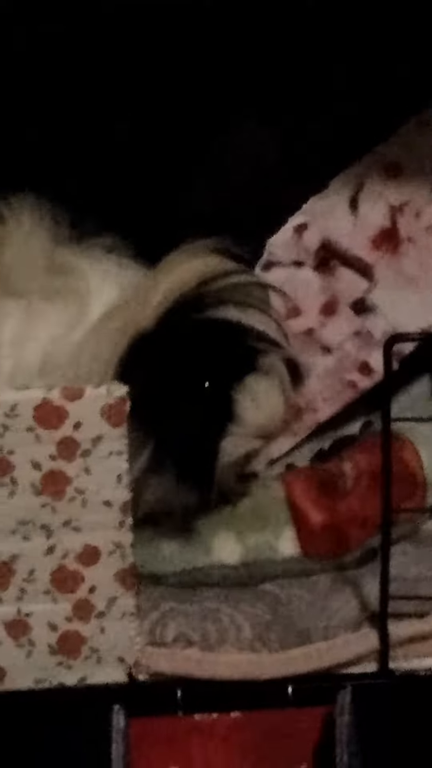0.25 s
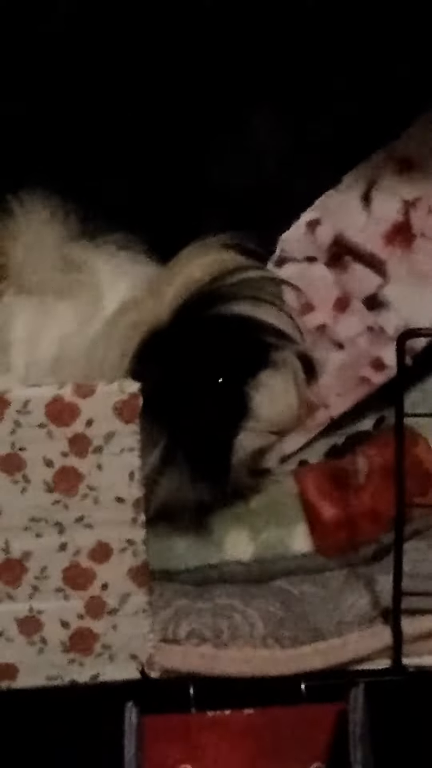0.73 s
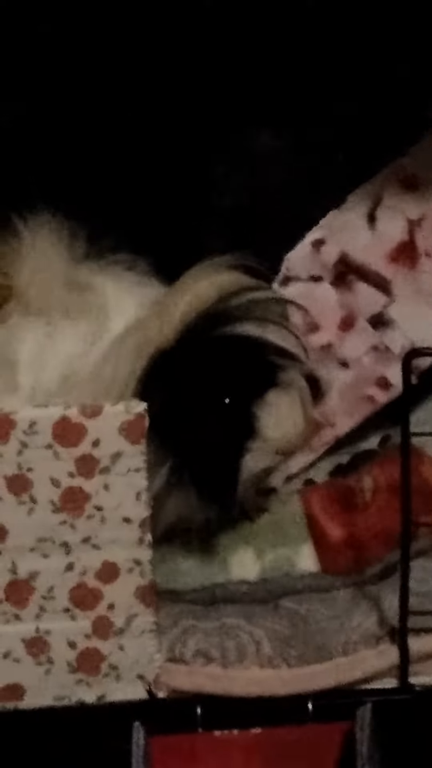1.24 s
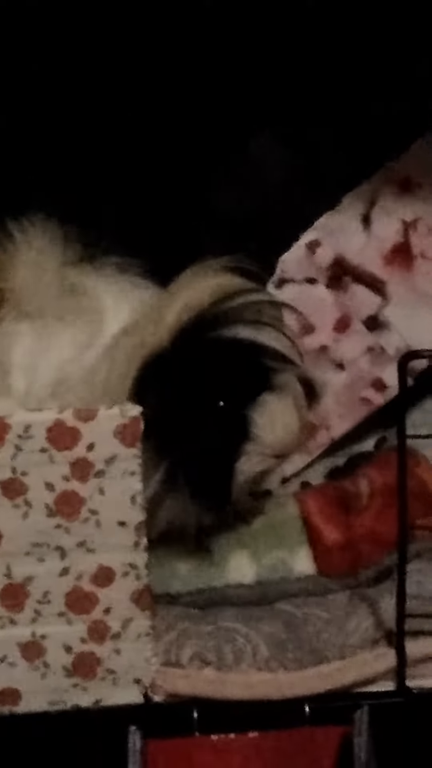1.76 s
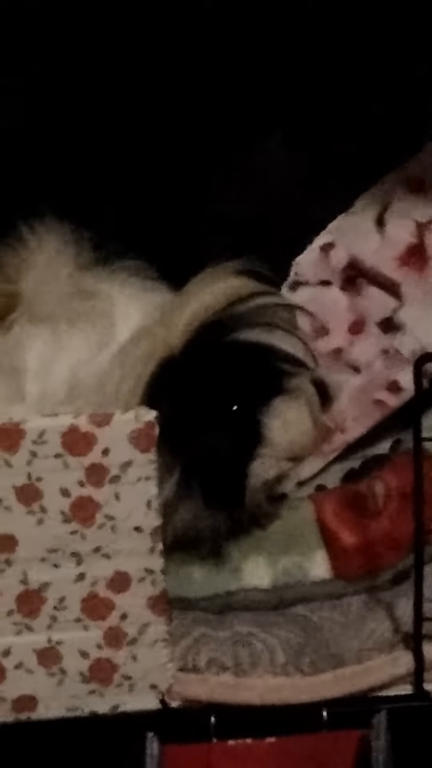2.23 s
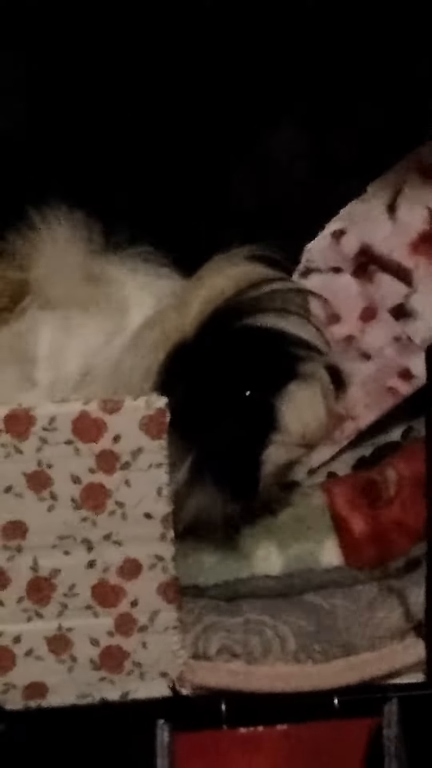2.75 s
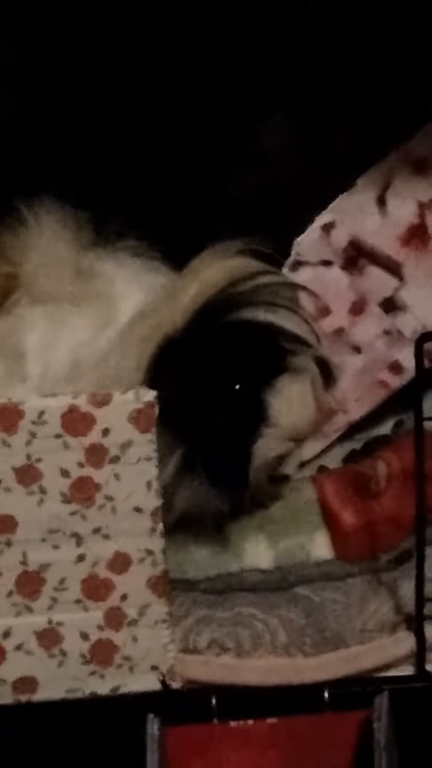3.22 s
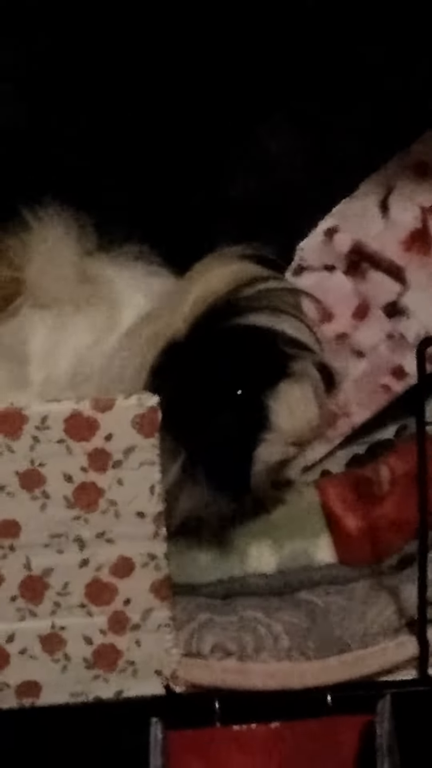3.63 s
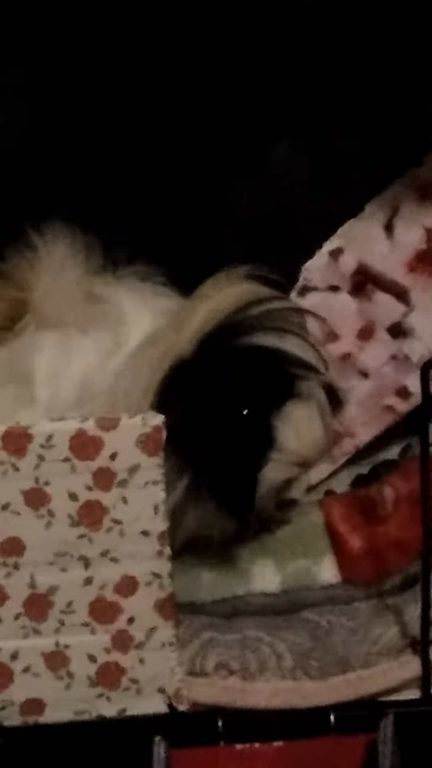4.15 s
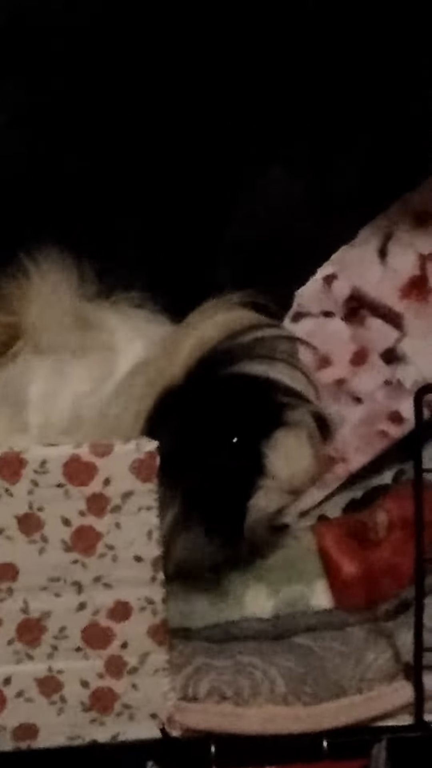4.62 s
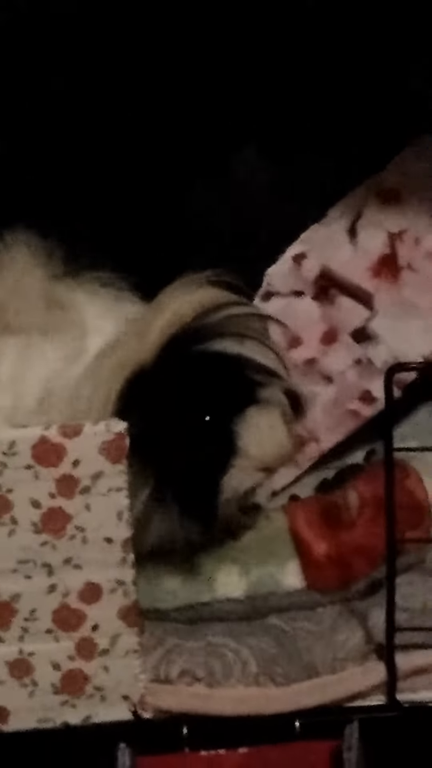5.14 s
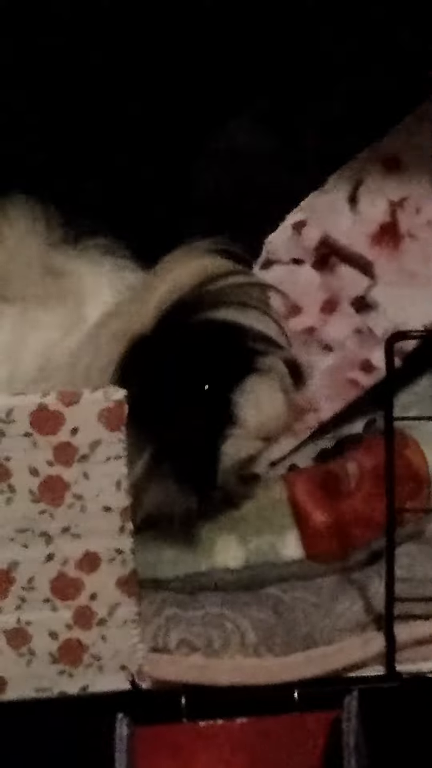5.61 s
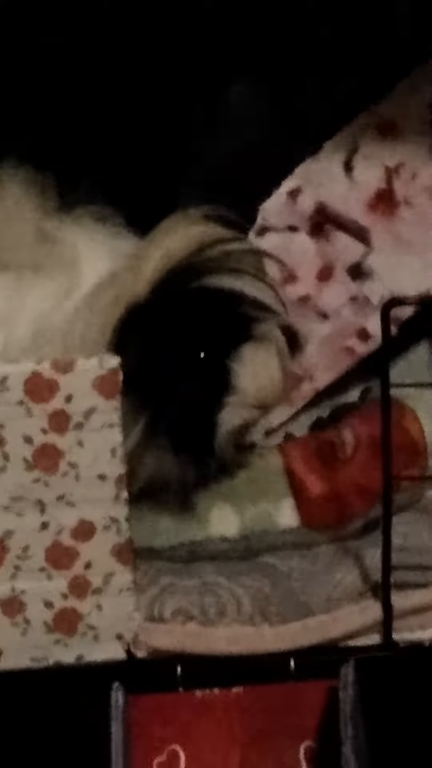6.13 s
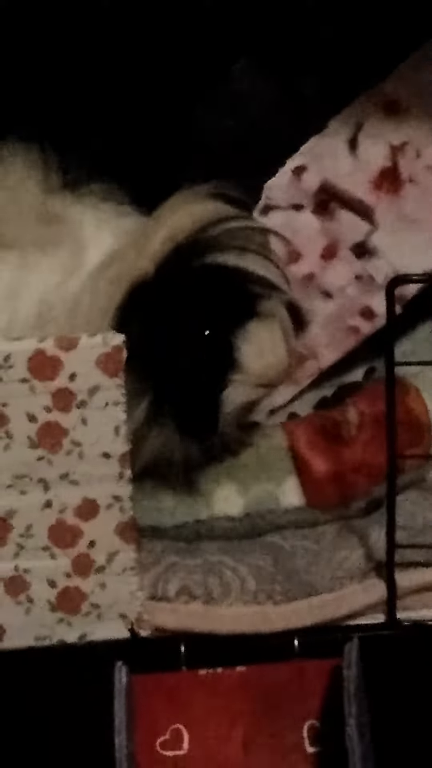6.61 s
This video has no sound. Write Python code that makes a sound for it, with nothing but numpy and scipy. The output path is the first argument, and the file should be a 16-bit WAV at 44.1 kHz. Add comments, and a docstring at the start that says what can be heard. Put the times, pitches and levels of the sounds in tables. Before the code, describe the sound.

Quick, high, falling chirps from a caged guinea pig run on over faint hiss, with one short lull.

```python
"""A quiet room, a phone microphone one step from a guinea pig in a fleece-lined cage, over a faint hiss.
From the start it chirps like a bird, six times a second: each a short falling whistle with overtones,
then a puff of air, echoed by cage and walls. Near 1.5 s three soft bumps touch the phone. After 4.2 s
the chirps turn faint and sparse, and the phone's noise gate lowers the hiss in the pauses.
From 5.6 s they are back at full strength, with one more bump near 6.2 s."""
import sys
import numpy as np
from scipy import signal
from scipy.fft import rfft, irfft, next_fast_len
from scipy.io import wavfile
from scipy.ndimage import uniform_filter1d

SR = 44100
rng = np.random.default_rng(int(sys.argv[2]) if len(sys.argv) > 2 else 0)


def inscribe(sig):
    """Save sig as 16-bit PCM at rate SR to the path in sys.argv[1].

    A 1-D sig is mono; a 2-D sig holds one channel per row.
    Samples are clipped to [-1, 1] before scaling.
    """
    pcm = np.round(np.clip(np.atleast_2d(sig).T, -1, 1) * 32767)
    wavfile.write(sys.argv[1], SR, pcm.astype(np.int16))


N = 302967
LEAD_IN = int(.1 * SR)  # samples before time zero, where the first chirp begins
PADDED = LEAD_IN + N + SR


def undb(db):
    """Decibels to amplitude."""
    return 10 ** (np.asarray(db) / 20)


def gain_at(table, hz):
    """Gain of an (f/Hz, level/dB) curve at any frequency."""
    f, db = np.transpose(table)
    return undb(np.interp(np.log(np.maximum(hz, 1)), np.log(f), db))


def colour(x, table):
    """Filter by an (f/Hz, level/dB) curve."""
    size = next_fast_len(len(x))
    hz = np.arange(size // 2 + 1) * SR / size
    return irfft(rfft(x, size) * gain_at(table, hz), size)[:len(x)]


def unit(x):
    """Scale to an RMS of one."""
    return x / np.sqrt(np.mean(x ** 2))


# Noise floor at the microphone: f/Hz, density/dB
HISS_SPECTRUM = [(12, -15), (20, -6.5), (33, -21.5), (107, -10), (207, -10), (297, -11), (380, -11.5),
                 (424, -11), (514, -12.5), (715, -14), (777, -15), (3340, -14.5), (14400, -29.5)]
# Side share of that noise: f/Hz, level/dB
HISS_WIDTH = [(300, -25), (2500, -42), (5000, -24), (8000, -3.5), (14000, -1)]

def hiss(level_db=-75):
    """Steady room and microphone noise, alike in both channels except the treble: mid, side."""
    mid, side = (colour(rng.standard_normal(N), HISS_SPECTRUM) for _ in range(2))
    gain = undb(level_db) / np.sqrt(np.mean(mid ** 2))
    return gain * mid, gain * colour(side, HISS_WIDTH)


# Handling noise, right at the microphone: t/s, level/dB, f/Hz
BUMPS = [(1.494, -65, 100.7), (1.543, -65, 228), (1.624, -65, 169), (6.176, -59.5, 173)]

def phone_bumps(t60_s=0.028):
    """Soft knocks on the phone, each a low, quickly damped tone."""
    out = np.zeros(N)
    t = np.arange(int(.1 * SR)) / SR
    decay = np.exp(-np.log(1000) * t / t60_s)
    for start, db, hz in BUMPS:
        at = int(start * SR)
        out[at:at + len(t)] += undb(db) * np.sin(2 * np.pi * hz * t) * decay
    return out


# Strongest echoes off cage and walls, timed from the direct sound: t/s, level/dB
REFLECTIONS = [(0.00456, -10.5), (0.01068, -10.5), (0.01478, -18.0), (0.0151, -16.5), (0.0266, -15),
               (0.031, -24), (0.0358, -21), (0.0389, -12), (0.053, -27.5), (0.0564, -16.5), (0.061, -14.5),
               (0.062, -24), (0.0678, -20.5), (0.07231, -26), (0.083, -27), (0.0958, -18.5)]
# What the walls return to the microphone: f/Hz, level/dB
WALL_COLOUR = [(1500, -21.5), (2200, -1), (2700, 3.5), (3200, -4), (4500, -4.5), (5700, -15), (7000, -3),
               (9000, -9.5), (14000, 1.5)]
# Side share of the echoes and of the puffs: f/Hz, level/dB
STEREO_WIDTH = [(2000, -40), (3500, -30), (5500, -20), (8000, -5), (12000, -7)]

def room_echoes(direct, t60_s=.5, build_s=0.0066, tail_db=-5, early_db=0.5, early_s=0.0995):
    """Mid: single echoes that melt into a diffuse tail. Side: only a diffuse treble tail."""
    t = np.arange(int(.8 * SR)) / SR
    decay = np.exp(-np.log(1000) * t / t60_s) * np.minimum(t / build_s, 1)
    mid, side = rng.standard_normal((2, len(t))) * decay * undb(tail_db) / np.sqrt(np.sum(decay ** 2))
    mid *= undb(early_db * np.clip((early_s - t) / .02, 0, 1))
    for delay, db in REFLECTIONS:
        mid += undb(db) * np.sinc((t - delay) * SR)
    reflected = colour(direct, WALL_COLOUR)
    wet_mid = signal.fftconvolve(reflected, mid)
    wet_side = signal.fftconvolve(colour(reflected, STEREO_WIDTH), side)
    return wet_mid[:len(direct)], wet_side[:len(direct)]


# Breath leaving the mouth: f/Hz, density/dB
PUFF_SPECTRUM = [(1100, -42), (1560, -7), (2000, -9.5), (3330, -11.5), (4150, 2.5), (4900, -5.5), (5500, 5),
                 (7500, -7), (9370, -3), (10200, -1.5), (11000, -6.5), (14300, -47)]
# Air past the teeth: f/Hz, density/dB
TEETH_SPECTRUM = [(9000, -18), (10800, 1.5), (12500, -9), (14300, -12)]

def breath(puff_envelope, sizzle_envelope):
    """Rushing air: a broad puff with a high sizzle from the teeth."""
    puff = unit(colour(rng.standard_normal(PADDED), PUFF_SPECTRUM))
    sizzle = unit(colour(rng.standard_normal(PADDED), TEETH_SPECTRUM))
    return puff_envelope * puff + sizzle_envelope * sizzle


def airflow(t, lead_s, plateau_s, lag_s=0.0036, puff_s=0.0085, leak_db=-12):
    """Breath envelope: a little air leaks before and during the whistle, then the puff follows."""
    release = np.maximum(t - lead_s - plateau_s - lag_s, 0) / puff_s
    leak = undb(leak_db) * np.minimum(t / lead_s, 1)
    return (np.e * release + leak) * np.exp(-release)


# Mouth and throat response, with the first resonance at 2700 Hz: f/Hz, level/dB
VOCAL_TRACT = [(1500, -28), (1900, -20), (2300, -6), (2700, 0), (3200, -5), (3500, -28), (4200, -13),
               (4600, -22), (5100, -15), (5600, 0), (6200, -17), (7200, -18), (7800, -4), (8400, -7),
               (9300, 6), (10000, -16), (11500, -24), (14000, -30)]

def whistle(hz, db, overtones_db, full_db=-45, faint_db=-51, open_hz=2725, slack_hz=2368):
    """Partials slide through the mouth's resonances, which sit lower in a faint, slack call."""
    mouth_hz = np.interp(db, (faint_db, full_db), (slack_hz, open_hz))
    phase = 2 * np.pi * np.cumsum(hz) / SR
    tone = np.zeros(len(hz))
    for k, partial_db in enumerate((0, *overtones_db), start=1):
        resonance = gain_at(VOCAL_TRACT, k * hz * 2700 / mouth_hz)
        tone += undb(db + partial_db) * resonance * np.sin(k * phase)
    return tone


# The animal, a step from the microphone: start t/s, voiced t/s, first f/Hz, last f/Hz,
# bend (1 straight, more = later and steeper fall), swell t/s, level/dB before the vocal tract,
# then relative to it: 2nd, 3rd, 4th partial level/dB, puff level/dB
CHIRP_CALLS = [(-0.045, 0.018, 2977, 2394, 0.98, 0.019, -36.5, -2.5, -24, -35, -24),
               (0.1048, 0.0154, 2890, 2224, 1.82, 0.0054, -34, -1.5, -21.0, -36.5, -24.5),
               (0.2443, 0.021, 2890, 2373, 1.63, 0.0042, -34, -0.5, -18.0, -20, -25.5),
               (0.3987, 0.017, 2813, 2270, 1.9, 0.0032, -33.5, 0.0, -14.5, -23.6, -24.5),
               (0.5484, 0.02, 2817, 2040, 1.34, 0.0029, -35.0, -1, -19, -15, -23),
               (0.6971, 0.018, 2913, 2097, 1.68, 0.0072, -33, 1, -17, -20.5, -23.0),
               (0.841, 0.02, 2900, 2360, 2.27, 0.0031, -34.5, 0.0, -18, -43, -24.5),
               (1.0169, 0.016, 2791, 2120, 2, 0.0048, -34.5, 0.5, -17.5, -28, -23.5),
               (1.1462, 0.025, 2918, 2280, 1.35, 0.0024, -33.0, 0, -16.0, -13, -25),
               (1.3024, 0.019, 2970, 2200, 1.05, 0.007, -34, 0, -21, -38, -24.5),
               (1.4466, 0.026, 2862, 2152, 1.89, 0.008, -33.5, -1.5, -17.0, -18.5, -23.5),
               (1.602, 0.018, 2878, 2273, 1.59, 0.0063, -33.5, 0, -14.0, -28.5, -24.0),
               (1.7633, 0.021, 2866, 2140, 2.17, 0.0064, -35.0, -0.5, -16.5, -42, -24),
               (1.9173, 0.025, 2915, 2166, 1.73, 0.0043, -35, 0.0, -17.5, -49, -23),
               (2.0721, 0.017, 2888, 2330, 1.86, 0.0033, -33.5, 1.5, -12, -20.5, -21),
               (2.2127, 0.026, 2905, 2155, 1.48, 0.0039, -35.5, -1.0, -17.5, -17, -24.5),
               (2.39, 0.022, 2915, 2200, 1.63, 0.0056, -33.5, 1.5, -10.5, -20.0, -21.5),
               (2.5273, 0.021, 2916, 2234, 1.8, 0.0041, -36.0, -0.5, -14, -23, -22),
               (2.702, 0.021, 2798, 2227, 1.46, 0.0041, -35.0, 2.0, -21.0, -26, -24),
               (2.842, 0.025, 2890, 2120, 1.34, 0.0052, -35.0, -1, -19, -16, -21.5),
               (3.0054, 0.028, 2841, 2130, 1.77, 0.0034, -33.5, 0.5, -16.0, -19.5, -22),
               (3.1489, 0.02, 2810, 2275, 1.28, 0.0034, -34.5, 0, -18.5, -16.5, -25),
               (3.3096, 0.024, 2873, 2046, 1.8, 0.0083, -34, 0, -22.7, -14.0, -22.5),
               (3.4677, 0.023, 2883, 2184, 1.96, 0.0084, -35.5, -0.5, -15, -23, -22.5),
               (3.6206, 0.023, 2906, 1995, 1.41, 0.01, -34.5, 0, -31, -15, -19),
               (3.7659, 0.019, 2853, 2315, 1.9, 0.0041, -33.5, -0.5, -14.5, -19, -25.0),
               (3.9401, 0.015, 2815, 2235, 1.4, 0.0056, -36.0, 0, -21, -21, -24.0),
               (4.0768, 0.02, 2973, 2270, 0.88, 0.005, -36, -2, -18.5, -20, -24.5),
               (4.2359, 0.017, 2780, 2155, 1.0, 0.022, -50.5, -0.5, -31.0, -30, -19),
               (4.3594, 0.023, 3336, 2565, 0.88, 0.0063, -45, -9.5, -49, -19, -25),
               (4.502, 0.016, 2947, 2120, 1.37, 0.0067, -51, 0, -26.0, -23.5, -20),
               (4.9877, 0.039, 2720, 1450, 1.9, 0.014, -60.5, -3.5, -41, -32, -17.5),
               (5.159, 0.024, 2980, 2166, 1.04, 0.009, -36, -1.5, -11, -20.5, -23),
               (5.2944, 0.025, 2880, 1500, 1.9, 0.0037, -54, 1, -20, -22, -16.5),
               (5.4597, 0.018, 2835, 1870, 2.17, 0.0054, -50.5, -0.5, -29.0, -24.5, -15),
               (5.623, 0.027, 3217, 2458, 1.3, 0.026, -36, -1, -11.5, -18, -24.5),
               (5.771, 0.024, 3285, 2607, 1.197, 0.021, -33.5, 4, -14, -18, -25.5),
               (5.9696, 0.017, 2907, 2163, 1.51, 0.0048, -36.0, 4, -14, -33.5, -24.5),
               (6.1509, 0.016, 3035, 2588, 1.35, 0.0058, -33, 4.5, -24.0, -49.5, -24.5),
               (6.319, 0.016, 2880, 2394, 1.8, 0.0018, -35.5, 2, -14.0, -33, -25.5),
               (6.4989, 0.02, 2892, 2276, 1.7, 0.0043, -35.5, 2.5, -15, -16, -24),
               (6.665, 0.013, 2704, 2125, 1.75, 0.0057, -38.5, 0, -19.0, -18, -20),
               (6.8064, 0.014, 2903, 2514, 1.9, 0.0035, -34, 3.5, -16, -14, -25.5)]

def guinea_pig(fade_s=0.0029, lead_s=0.026, droop_db=-3, rough_db=3, rough_hz=380, lowest_hz=1430):
    """Falling whistles of six partials, each followed by a puff of air: mid, side."""
    voice, puffs, sizzles = np.zeros((3, PADDED))
    size = int(SR / rough_hz)
    waver = unit(uniform_filter1d(uniform_filter1d(rng.standard_normal(PADDED), size), size))
    t = np.arange(int(.14 * SR)) / SR
    for start, voiced, first_hz, last_hz, bend, swell, db, db2, db3, db4, puff_db in CHIRP_CALLS:
        at = LEAD_IN + int(start * SR)
        span = slice(at, at + len(t))
        hz = np.maximum(first_hz - (first_hz - last_hz) * (t / voiced) ** bend, lowest_hz)
        rise = np.sin(np.pi / 2 * np.minimum(t / swell, 1))
        fade = np.exp(-np.maximum(t - voiced, 0) / fade_s)
        plateau_s = 0.41 * voiced  # after this the dropping voice weakens and wavers
        weakening = np.clip((t - plateau_s) / (voiced - plateau_s), 0, 1)
        falter = undb(weakening * (droop_db + rough_db * waver[span]))
        voice[span] += rise * fade * falter * whistle(hz, db, (db2, db3, db4, db4 - 4, db4 - 8))

        air = undb(db + puff_db) * airflow(t, lead_s, plateau_s)
        sizzle_db = -15 + 0.15 * (db4 + 24.5)  # more sizzle with a strong 4th partial
        ahead = at - int(lead_s * SR)
        puffs[ahead:ahead + len(t)] += air
        sizzles[ahead:ahead + len(t)] += air * undb(sizzle_db)
    air_mid, air_side = (breath(puffs, sizzles) for _ in range(2))
    return voice + air_mid, colour(air_side, STEREO_WIDTH)


def scene():
    """Left and right at the microphone: the animal straight ahead, its echoes, hiss and bumps."""
    call_mid, call_side = guinea_pig()
    wet_mid, wet_side = room_echoes(call_mid)
    hiss_mid, hiss_side = hiss()
    mid = (call_mid + wet_mid)[LEAD_IN:LEAD_IN + N] + hiss_mid + phone_bumps()
    side = (call_side + wet_side)[LEAD_IN:LEAD_IN + N] + hiss_side
    return np.array([mid + side, mid - side])


def record(dry, gate_db=-66, knee_db=2, depth_db=-6.5, hold_s=0.044, offset_db=-82.5, top_hz=14300):
    """The phone: a soft gate turns quiet stretches down, then a small DC offset and a steep top cut."""
    size = int(hold_s * SR)
    level_db = 10 * np.log10(uniform_filter1d(dry.mean(axis=0) ** 2, size) + 1e-12)
    shut = uniform_filter1d(1 / (1 + np.exp((level_db - gate_db) / knee_db)), size)
    gated = dry * undb(depth_db * shut)
    lowpass = signal.ellip(12, .5, 80, top_hz, fs=SR, output="sos")
    return signal.sosfilt(lowpass, gated - undb(offset_db))


dry = scene()
out = record(dry)
inscribe(out)
```